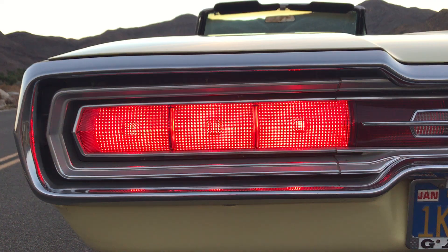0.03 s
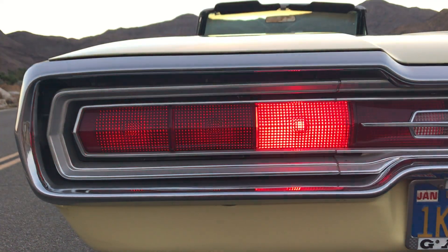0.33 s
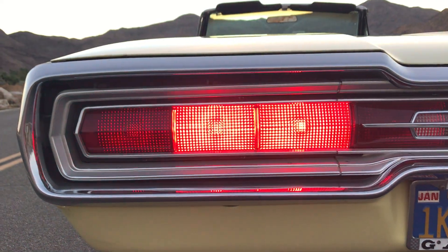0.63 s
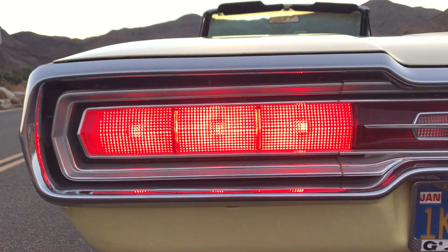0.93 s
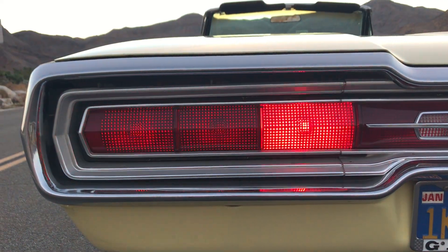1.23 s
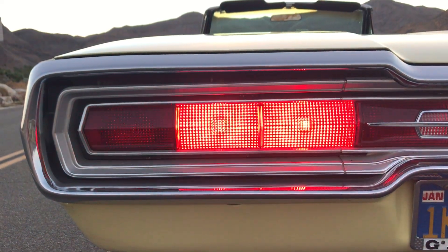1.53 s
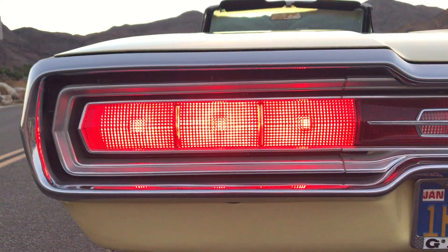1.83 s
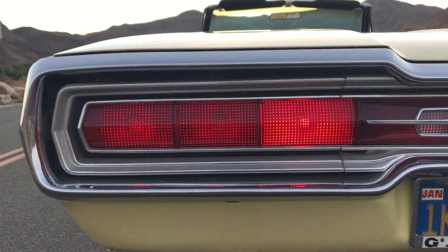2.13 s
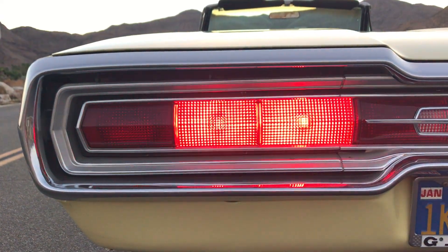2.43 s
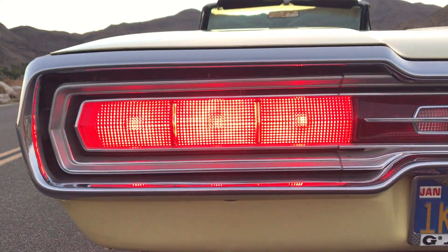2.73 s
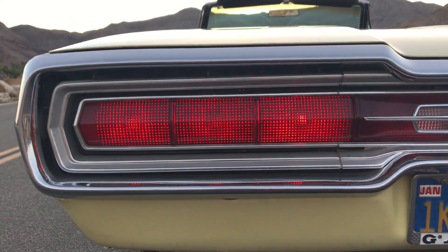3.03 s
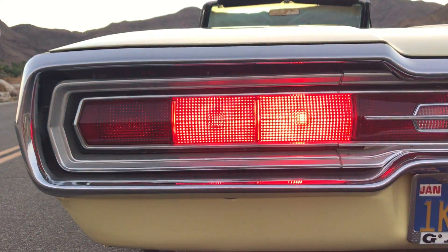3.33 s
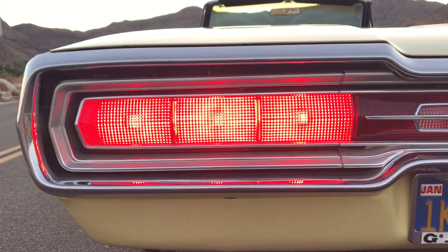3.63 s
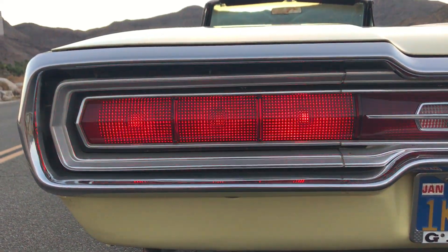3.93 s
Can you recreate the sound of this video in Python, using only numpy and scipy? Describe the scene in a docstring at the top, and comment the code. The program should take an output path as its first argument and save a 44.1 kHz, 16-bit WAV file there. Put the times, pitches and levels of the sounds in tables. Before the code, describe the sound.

Soft, muffled flasher relay clicks repeat about once a second, heard just behind an old car outdoors. Low wind thumps hit the microphone, mostly at first, with faint hiss, a few tiny metal ticks and one sharp metallic snap late on.

```python
"""Beside a quiet road, just behind the tail lamp of a parked old car with its sequential turn signal on.
In each cycle the lamp relays knock softly and the flasher contact clicks shut and open, muffled by the
body; each impact excites damped modes. Metal ticks now and then, probably as it cools, and snaps once.
Light wind buffets the microphone over a faint hiss, in which a distant drone and a thin whine swell."""
import sys
import numpy as np
from scipy import signal
from scipy.fft import irfft
from scipy.io import wavfile
from scipy.ndimage import uniform_filter1d

SR = 44100
rng = np.random.default_rng(int(sys.argv[2]) if len(sys.argv) > 2 else 0)


def store_wav(level_fs):
    """Save 16-bit WAV to argv[1]."""
    pcm = np.round(np.clip(np.atleast_2d(level_fs), -1, 1) * 32767)
    wavfile.write(sys.argv[1], SR, pcm.T.astype(np.int16))


N = 176400
EVENT_TIME = np.arange(8192) / SR  # time axis of one short event, in seconds

# Spectrum of still air: frequency_hz, relative_density_db
HISS_SPECTRUM = [(100, 16), (300, 10.5), (540, 3.5), (700, 4.5), (820, 7), (950, 1.5), (1280, 0.5),
                 (1500, -2), (2500, -5), (4300, -7), (5000, -10.5), (6100, -7.5), (7800, -12),
                 (9600, -10.5), (10400, -13.5), (11500, -9), (14000, -9.5), (16000, -10.5)]
# Strength of the wind rumble: time_s, level_db
RUMBLE_LEVELS = [(0.091, -39), (0.22, -47.5), (0.25, -52.5), (0.31, -41), (0.539, -38), (0.569, -53),
                 (0.661, -42.5), (0.742, -38), (0.852, -50.5), (0.92, -42), (1.03, -44.5), (1.35, -50),
                 (1.66, -49.5), (1.77, -44), (2.05, -50), (2.12, -43.5), (2.239, -45), (2.3, -52.5),
                 (2.8, -57.5), (2.95, -44), (3.05, -55.5), (3.22, -55.5), (3.36, -48), (3.5, -53.5),
                 (3.7, -52.5), (3.9, -58), (4.0, -58)]
# Spectrum of the wind rumble: frequency_hz, relative_density_db
RUMBLE_SPECTRUM = [(18, -32.5), (30, -9.5), (45, 0), (65, 3.5), (100, -3), (140, -8), (200, -17),
                   (300, -26), (420, -39.5), (700, -59.5), (1500, -69.5)]
# Eddies striking the microphone: peak_s, level_db, upper_edge_hz, sigma_s
WIND_EDDIES = [(0.145, -40.5, 286, 0.0048), (0.195, -33, 300, 0.0073), (0.311, -34, 324, 0.01),
               (0.353, -32.5, 450, 0.008), (0.422, -34.5, 327, 0.0091), (.51, -34, 267, 0.015),
               (0.633, -32.5, 342, .009), (0.664, -27, 604, 0.0059), (0.716, -40, 350, .012),
               (0.793, -26.5, 292, 0.0077), (0.892, -27.5, 248, 0.0088), (.912, -26, 360, 0.0056),
               (1.062, -44.5, 268, 0.0049), (1.24, -39.5, 216, 0.0091), (1.415, -44, 276, 0.0088),
               (1.631, -42.5, 324, 0.011), (1.748, -37.5, 254, 0.0096), (2.207, -48.5, 220, 0.0089),
               (2.91, -40, 198, 0.0051), (3.363, -35, 291, 0.012)]

# Knocks of the lamp relays, timed from the closing click: offset_s, level_db
RELAY_KNOCKS = [(-.173, -59), (-.158, -63), (-.015, -60.5), (.287, -68.5), (.302, -63)]
# Modes of the closing contact: pitch_hz, relative_db, t60_s
CLOSING_MODES = [(1636, -1.5, 0.12), (1700, -2, .045), (3240, -13, 0.17), (4300, -14.5, 0.19),
                 (5560, -14, 0.16), (5920, -10, 0.098), (5960, -19, 0.19), (11150, -17, 0.057),
                 (11380, -9, 0.047), (12800, -10, 0.049)]
# Rattle of the closing contact: frequency_hz, relative_density_db
CLOSING_SPECTRUM = [(800, -5), (2500, -29.5), (3600, -13.5), (4800, -12), (5800, -3.5), (6800, -12.5),
                    (9000, -23), (11400, -25), (13000, -20), (15500, -20)]
# Modes of the releasing contact: pitch_hz, relative_db, t60_s
RELEASING_MODES = [(1284, -7.5, 0.27), (1650, -6.5, 0.15), (3770, -6, 0.18), (4570, -2, 0.17),
                   (5860, -6.5, 0.17), (7300, -9, 0.21), (9790, -6.5, 0.23), (9830, -6, 0.044),
                   (10150, -11, 0.057), (11300, -17, .08)]
# Rattle of the releasing contact: frequency_hz, relative_density_db
RELEASING_SPECTRUM = [(800, 12.5), (2400, -3), (4300, 1), (5200, 1), (6000, -1), (8500, -5.5), (10000, 5),
                      (10600, -5), (12800, -2), (15500, -24)]

# Swells of the distant drone: peak_s, sigma_s
DRONE_SWELLS = [(.35, 0.11), (3.0, 0.29)]
# Faint metal ticks: start_s, level_db, centre_hz, half_width_octaves, rise_s, t60_s
METAL_TICKS = [(0.487, -75, 3220, 1.9, 0.0052, .09), (1.707, -66.5, 2560, 0.79, .011, 0.13),
               (2.395, -72.5, 3580, 1.2, .004, .09), (2.724, -66.5, 6770, 0.68, 0.0024, 0.065),
               (2.728, -69, 1880, 0.59, 0.0037, 0.18), (3.908, -64.5, 2620, 0.62, 0.0095, 0.11)]
# Modes of the ticking panel: pitch_hz, relative_db, t60_s
PANEL_MODES = [(2410, -3.5, .2), (3320, -6, 0.19)]
# Swells of the high whine: peak_s, sigma_s
WHINE_SWELLS = [(0.576, 0.069), (.86, 0.076), (1.782, .13), (2.83, .13), (3.74, .04)]
# Modes of the snapping metal: pitch_hz, relative_db, t60_s
SNAP_RING_MODES = [(897, -3, 0.14), (1415, -5.5, 0.15), (2274, 3.5, 0.039), (2860, -1, 0.044),
                   (4050, -25, 0.072), (5230, -9, 0.055), (6030, -3.5, 0.074), (6840, -25, 0.08),
                   (9000, -27, 0.074), (9049, -17, 0.042), (9600, -27, 0.07), (11700, 1.5, 0.042)]
# Crack of the snapping metal: frequency_hz, relative_density_db
CRACK_SPECTRUM = [(300, -36), (600, -2), (1000, 1), (1450, 3.5), (1900, -3.5), (2600, 4.5), (4500, -1),
                  (6200, 2), (8000, -3), (9300, 6), (10500, -5.5), (12200, 0), (14000, -4.5), (15800, -11)]


def undb(db):
    """Amplitude ratio of a level in decibels."""
    return 10 ** (np.asarray(db) / 20)


def unit(x):
    """Normalisation to rms 1."""
    return x / np.sqrt(np.mean(x ** 2))


def shaped(gain, size):
    """Random phases under the amplitude spectrum gain(hz) give coloured noise of rms 1."""
    hz = np.maximum(np.arange(size // 2 + 1) * SR / size, 1)
    return unit(irfft(gain(hz) * np.exp(2j * np.pi * rng.random(len(hz))), size))


def noise(spectrum, size=len(EVENT_TIME)):
    """Coloured noise whose spectrum is interpolated in decibels over log frequency."""
    points_hz, db = np.array(spectrum).T
    return shaped(lambda hz: undb(np.interp(np.log(hz), np.log(points_hz), db)), size)


def wander(rate_hz):
    """Smoothing random steps gives a slow fluctuation of rms 1."""
    hold = int(SR / rate_hz)
    steps = np.repeat(rng.standard_normal(N // hold + 1), hold)
    return unit(uniform_filter1d(uniform_filter1d(steps, hold), hold)[:N])


def add(out, start_s, sound):
    """Superposition of a sound on out, beginning at start_s."""
    start = int(round(start_s * SR))
    first, end = max(start, 0), min(start + len(sound), N)
    if end > first:
        out[first:end] += sound[first - start:end - start]


def sine(hz, phase_cycles=0):
    """Simple harmonic motion over one short event."""
    return np.sin(2 * np.pi * (hz * EVENT_TIME + phase_cycles))


def strike(rise_s, t60_s):
    """Envelope of a damped vibration: a linear rise, then an exponential fall of 60 dB in t60_s."""
    decay = np.exp(-np.log(1000) * np.maximum(EVENT_TIME - rise_s, 0) / t60_s)
    return np.minimum(EVENT_TIME / rise_s, 1) * decay


def ring(modes, rise_s):
    """Free vibration is a sum of damped modes; each blow has random phases and a slight detuning."""
    draws = rng.standard_normal((len(modes), 2))
    return sum(undb(db) * strike(rise_s, t60_s) * sine(hz * (1 + 0.0045 * detune), phase)
               for (hz, db, t60_s), (detune, phase) in zip(modes, draws))


def swelling_band(swells, centre_hz, half_width_hz):
    """Narrow-band noise is heard as a pitch; Gaussian envelopes fade it in and out."""
    t = np.arange(N) / SR
    envelope = sum(np.exp(-.5 * ((t - peak_s) / sigma_s) ** 2) for peak_s, sigma_s in swells)
    return envelope * shaped(lambda hz: 1 / (1 + ((hz - centre_hz) / half_width_hz) ** 2), N)


def air_hiss(level_db=-69.5, waver_db=.3):
    """The outdoor noise floor is broadband noise of almost constant level."""
    return noise(HISS_SPECTRUM, N) * undb(level_db + waver_db * wander(rate_hz=4.57))


def wind_rumble(flutter_db=2.0):
    """Turbulent pressure at the microphone is low-frequency noise whose level follows the breeze."""
    time_s, db = np.array(RUMBLE_LEVELS).T
    breeze_db = np.interp(np.arange(N) / SR, time_s, db)
    return noise(RUMBLE_SPECTRUM, N) * undb(breeze_db + flutter_db * wander(rate_hz=25.08))


def flasher(cycle_s=.9277, first_close_s=-.1745, release_after_s=.3165):
    """Impacts excite resonances: each cycle has five relay knocks and two ringing, rattling clicks."""
    out = np.zeros(N)
    knock = (0.31 * sine(hz=797) + 0.69 * sine(hz=819)) * strike(rise_s=0.0069, t60_s=0.089)  # modes beat
    for close_s in first_close_s + cycle_s * np.arange(int(N / SR / cycle_s) + 1):
        for offset_s, db in RELAY_KNOCKS:
            add(out, close_s + offset_s, undb(db) * knock)
        closing = undb(-66.5) * ring(CLOSING_MODES, rise_s=0.0058)
        closing += undb(-62.5) * noise(CLOSING_SPECTRUM) * strike(rise_s=0.0012, t60_s=0.085)
        add(out, close_s, closing)
        release = undb(-71) * ring(RELEASING_MODES, rise_s=0.0036)
        release += undb(-64) * noise(RELEASING_SPECTRUM) * strike(rise_s=0.01, t60_s=.11)
        add(out, close_s + release_after_s, release)
    return out


def wind_eddies(swirl_gain_db=-3.5, sway_gain_db=2.5):
    """A passing eddy gives a burst of turbulent noise, and the air behind it sways in a damped tone."""
    out = np.zeros(N)
    t = EVENT_TIME - EVENT_TIME.mean()
    highpass = signal.butter(2, 40, "high", fs=SR, output="sos")
    lowpass = signal.butter(2, 300, fs=SR, output="sos")
    port = lambda hz: 1 + 0.72 / (1 + ((hz - 560) / 60) ** 2)  # resonance of the microphone opening
    for peak_s, db, edge_hz, sigma_s in WIND_EDDIES:
        window = np.exp(-.5 * (t / sigma_s) ** 2)
        colour = lambda hz: port(hz) / (1 + (70.5 / hz) ** 4) / (1 + (hz / edge_hz) ** 5.04) / hz
        swirl = unit(signal.sosfilt(highpass, shaped(colour, len(t)) * window))
        add(out, peak_s + t[0], undb(db + swirl_gain_db) * swirl * np.sqrt(np.mean(window ** 2)))
        sway_hz = 74.2 * np.exp(.15 * rng.standard_normal())
        sway = sine(sway_hz) * strike(rise_s=0.0039, t60_s=0.086)
        add(out, peak_s - sigma_s, undb(db + sway_gain_db) * signal.sosfilt(lowpass, sway))
    return out


def distant_drone():
    """A narrow noise band gives a faint pitched drone, perhaps tyres far along the road."""
    return undb(-81.5) * swelling_band(DRONE_SWELLS, centre_hz=1264, half_width_hz=90)


def metal_ticks():
    """Selective excitation: each tick under the car rings most the panel modes near its own pitch."""
    out = np.zeros(N)
    for start_s, db, centre_hz, octaves, rise_s, t60_s in METAL_TICKS:
        colour = lambda hz: 1 / (1 + np.abs(np.log2(hz / centre_hz) / octaves) ** 3)
        tick = shaped(colour, len(EVENT_TIME)) * strike(rise_s, t60_s)
        panel = sum(colour(mode[0]) ** 2 * ring([mode], rise_s) for mode in PANEL_MODES)
        add(out, start_s, undb(db) * (tick + panel))
    return out


def high_whine():
    """A very narrow noise band approaches a pure tone: a thin whine that comes and goes."""
    return undb(-92.5) * swelling_band(WHINE_SWELLS, centre_hz=9400, half_width_hz=58)


def metal_snap(start_s=3.6624, crossover_hz=4200):
    """Damping depends on frequency: the crack's treble dies first; its low band and the modes ring on."""
    out = np.zeros(N)
    broadband = noise(CRACK_SPECTRUM)
    low = signal.sosfiltfilt(signal.butter(2, crossover_hz, fs=SR, output="sos"), broadband)
    treble = broadband - low
    crack = low * strike(rise_s=0.0033, t60_s=0.09) + treble * strike(rise_s=.0002, t60_s=0.034)
    add(out, start_s, undb(-42) * crack + undb(-53.5) * ring(SNAP_RING_MODES, rise_s=0.00083))
    return out


def scene():
    """Sound pressures from the car and the outdoors add linearly at one point."""
    car = flasher() + metal_ticks() + metal_snap()
    outdoors = wind_rumble() + wind_eddies() + air_hiss() + high_whine() + distant_drone()
    return (car + outdoors)[None, :]


def record(dry):
    """Gating and band limiting: the sound enters after a brief silence and loses its highest treble."""
    start_s, fade_s, cutoff_hz = .083, .002, 15800
    gate = np.clip((np.arange(N) / SR - start_s) / fade_s, 0, 1)
    return signal.sosfilt(signal.ellip(10, .2, 70, cutoff_hz, fs=SR, output="sos"), dry * gate)


dry = scene()
out = record(dry)
store_wav(out)
```